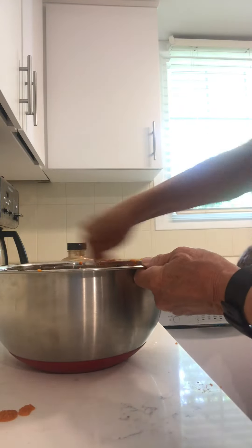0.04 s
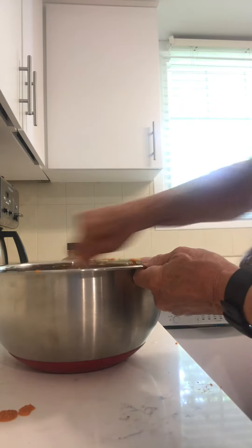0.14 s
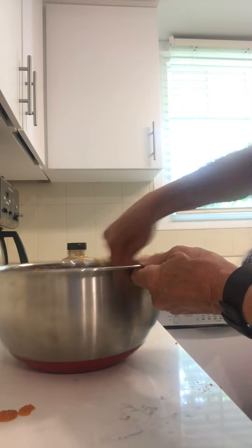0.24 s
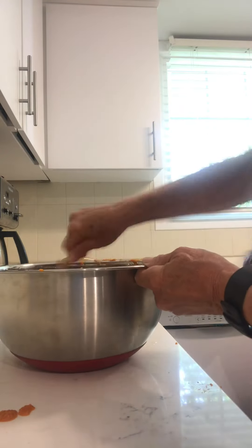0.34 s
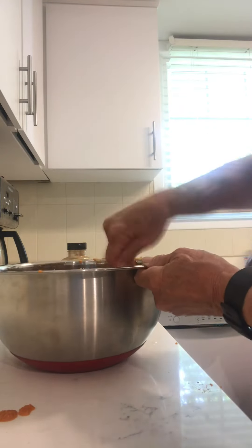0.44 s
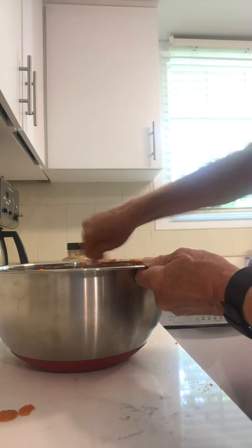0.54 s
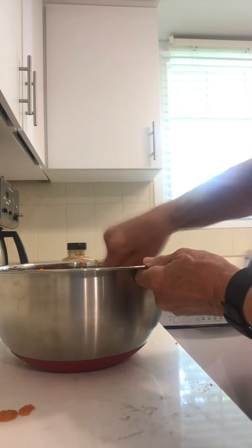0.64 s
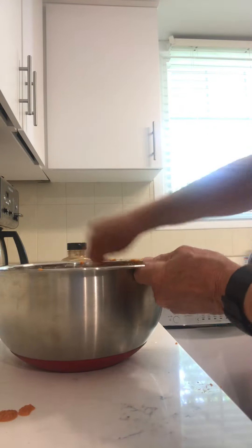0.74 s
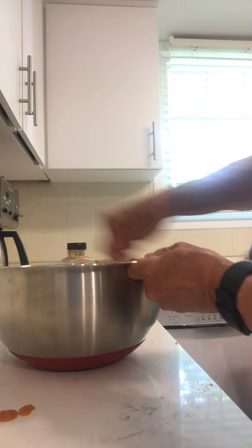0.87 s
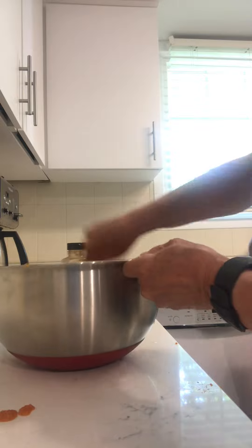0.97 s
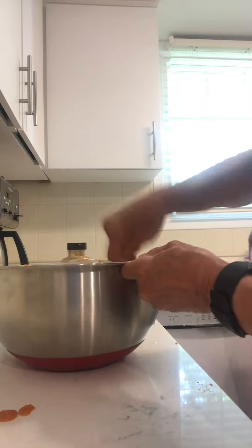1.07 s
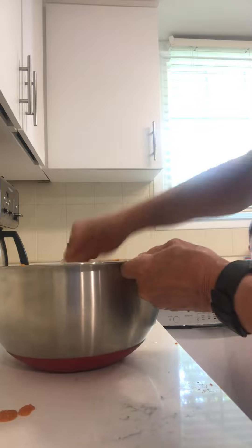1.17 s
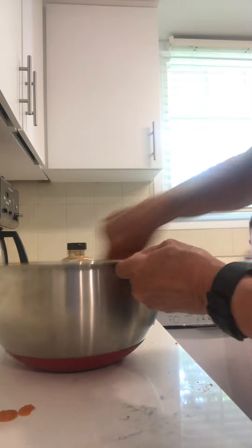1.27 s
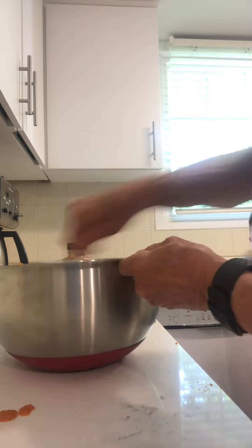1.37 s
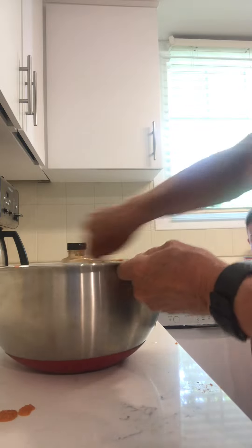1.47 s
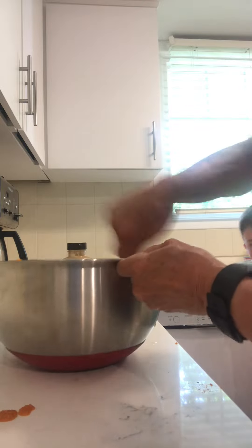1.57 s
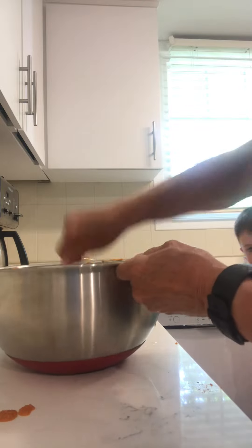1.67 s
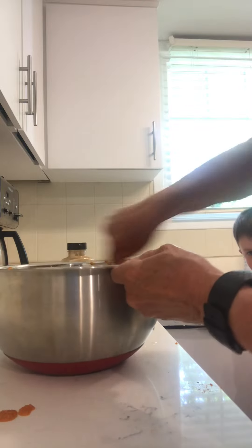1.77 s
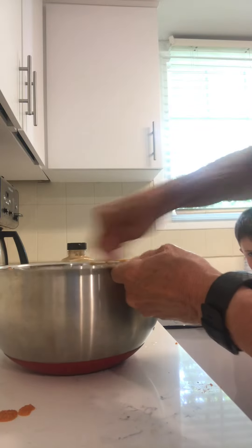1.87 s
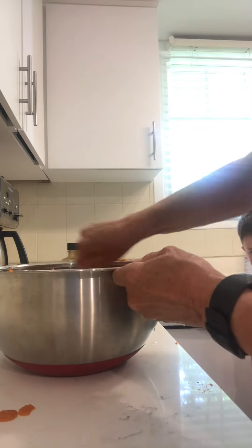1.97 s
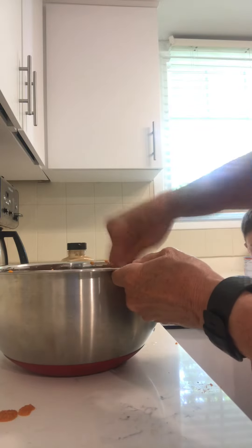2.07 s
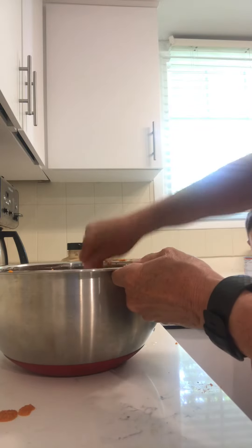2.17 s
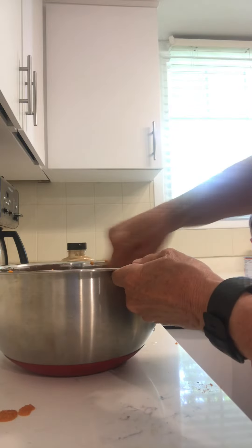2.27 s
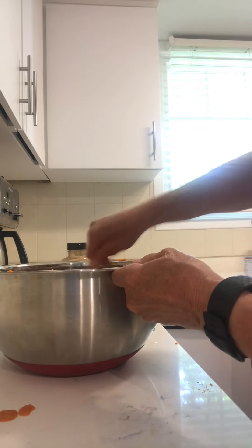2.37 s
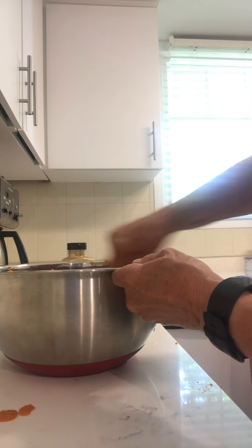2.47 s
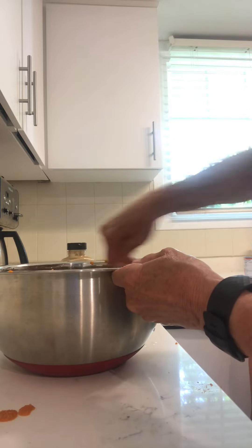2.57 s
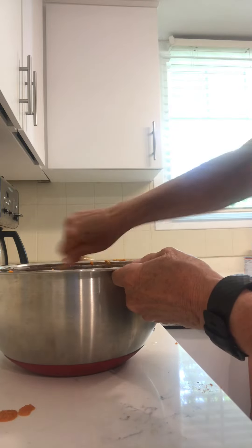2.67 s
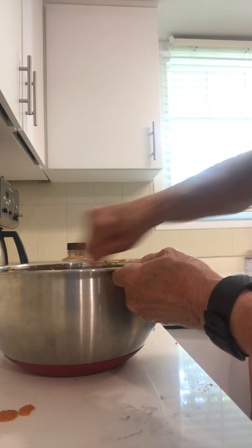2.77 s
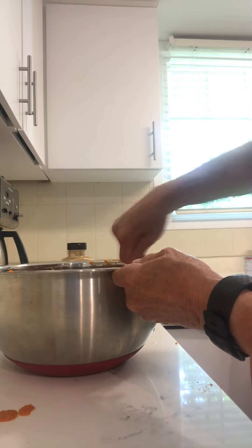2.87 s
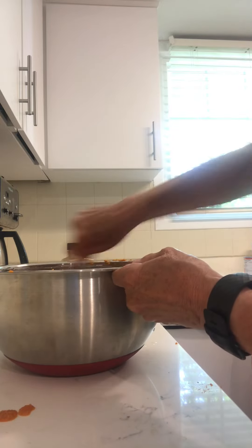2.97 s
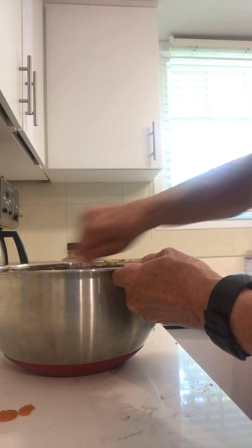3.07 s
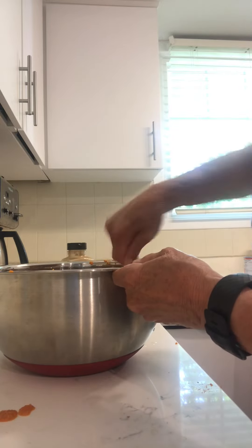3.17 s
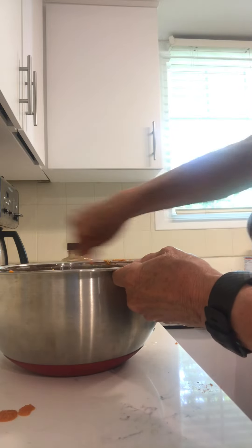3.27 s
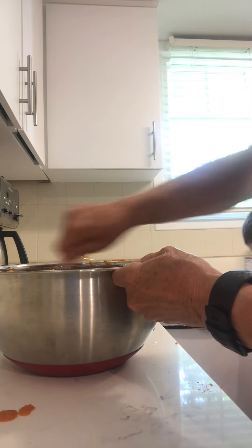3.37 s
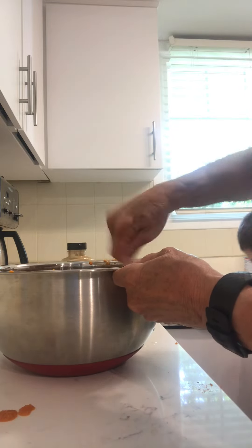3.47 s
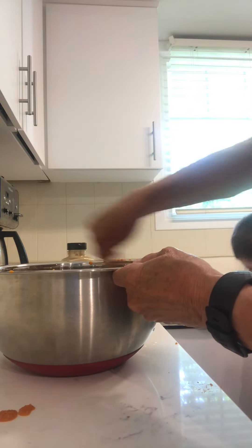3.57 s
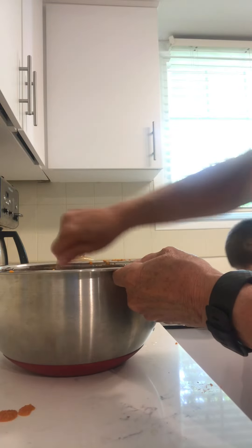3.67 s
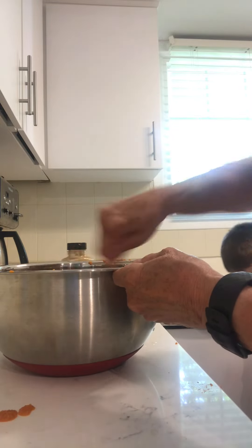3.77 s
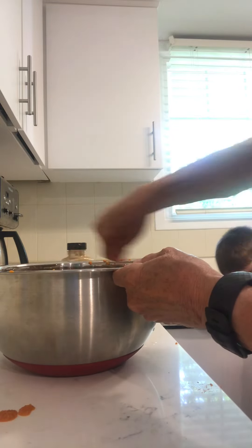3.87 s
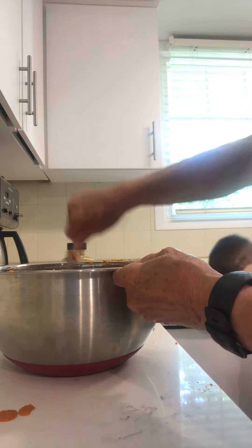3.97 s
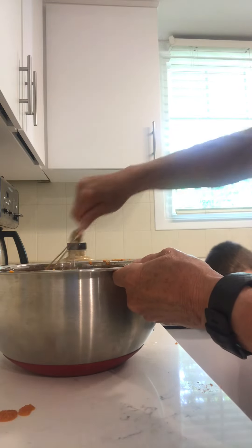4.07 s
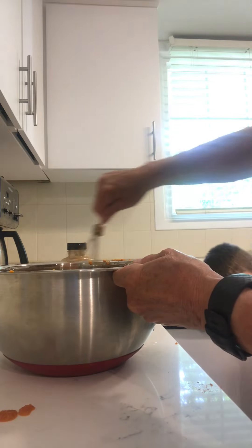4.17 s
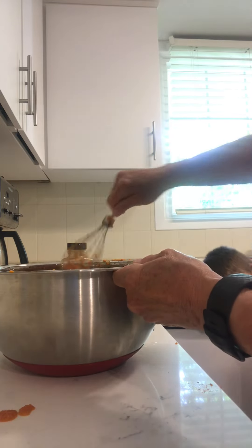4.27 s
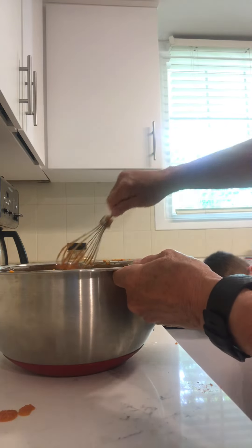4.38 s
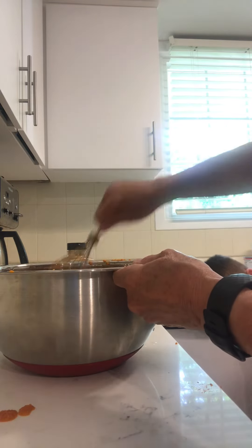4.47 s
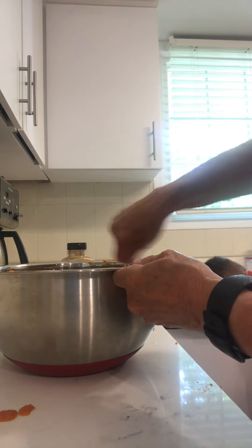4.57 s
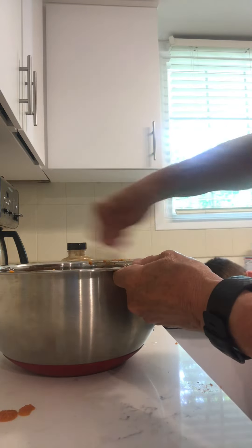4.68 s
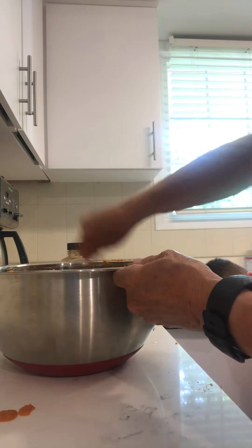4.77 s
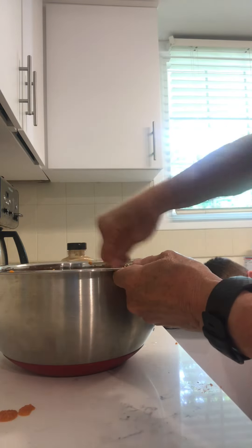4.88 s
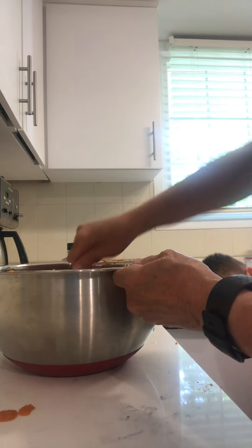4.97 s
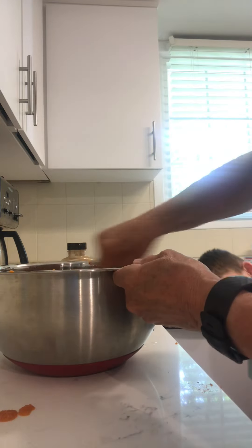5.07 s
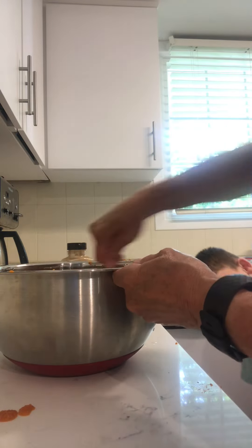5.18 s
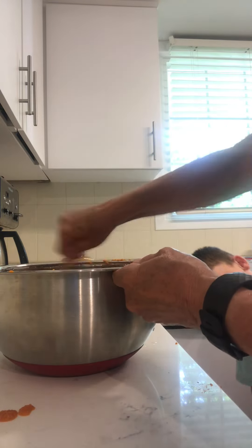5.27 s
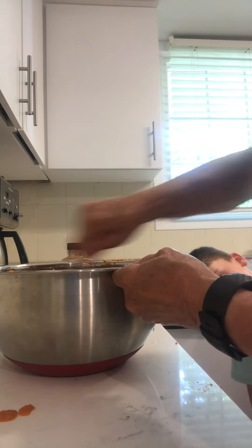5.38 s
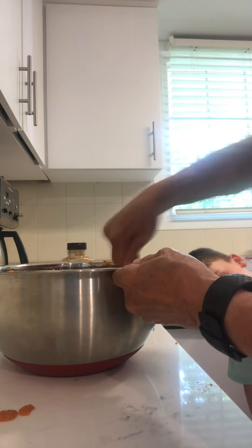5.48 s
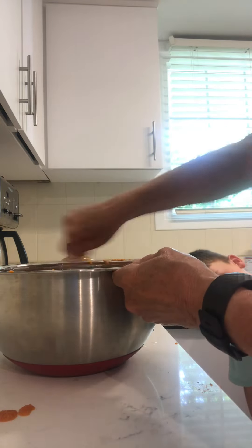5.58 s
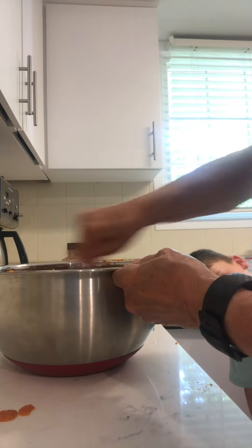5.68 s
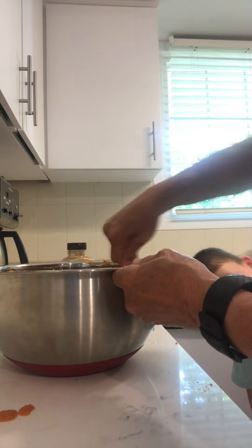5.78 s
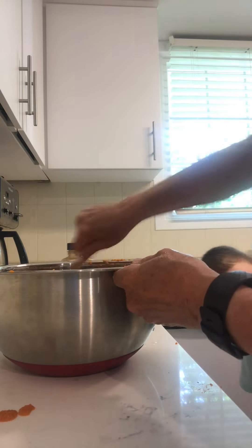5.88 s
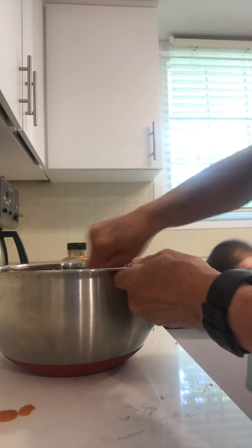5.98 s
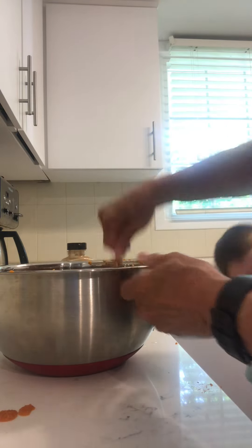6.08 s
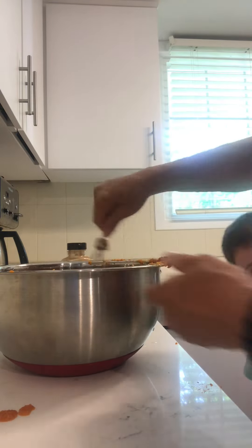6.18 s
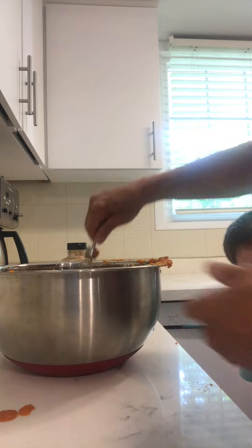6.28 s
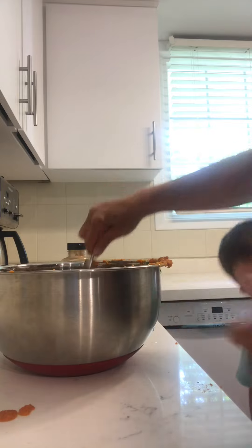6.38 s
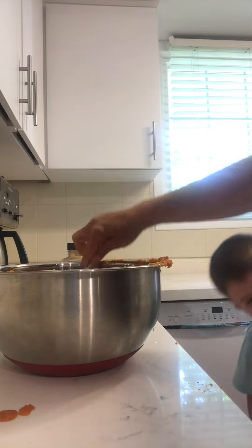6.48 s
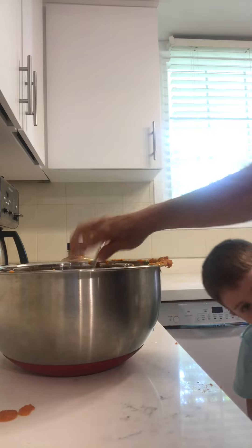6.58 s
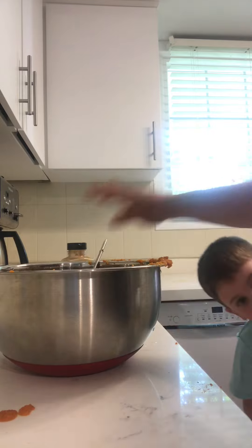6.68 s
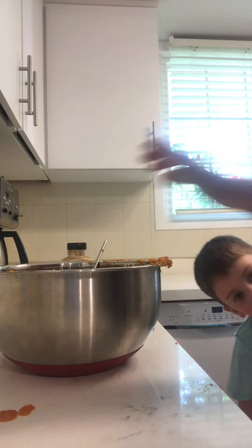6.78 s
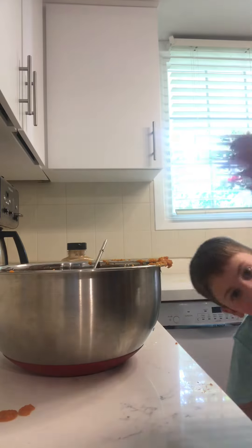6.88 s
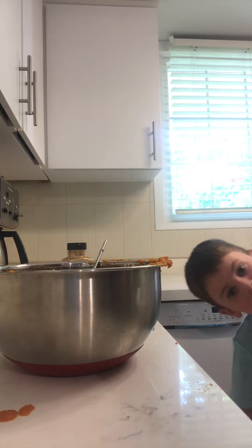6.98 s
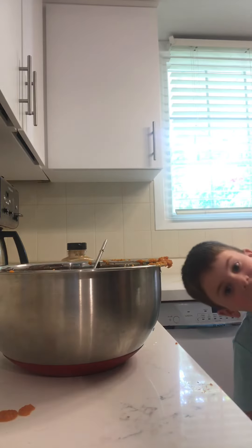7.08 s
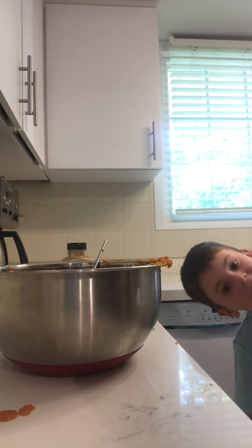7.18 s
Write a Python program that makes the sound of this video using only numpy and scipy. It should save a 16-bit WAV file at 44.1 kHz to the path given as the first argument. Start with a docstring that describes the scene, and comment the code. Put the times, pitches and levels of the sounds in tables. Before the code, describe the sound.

Close, wet whisking in a metal mixing bowl, quick swipes and dull knocks, a brief pause, slower strokes, then a sharp steel clank.

```python
"""A small kitchen, one microphone close to the counter: a wire whisk beats thick filling in a steel mixing bowl.
At about three to four turns a second the wires swish along the wall (filtered bursts of slips), knock on it
and strike it (decaying modes), over squelch and gulps of the filling (shaped noise and short tones).
The squelch drops away, returns and fades; the whisk slides down the rim and drops against it with a clank.
Behind it stand a fridge hum (steady sines), soft air (shaped noise) and the echoes of the room."""
import sys
import numpy as np
from scipy import signal
from scipy.fft import rfft, irfft
from scipy.io import wavfile

SR = 44100
rng = np.random.default_rng(int(sys.argv[2]) if len(sys.argv) > 2 else 0)


def wav_out(sig):
    """Save sig, one row per channel (or a flat mono array), as 16-bit PCM at SR to the path in sys.argv[1]."""
    wavfile.write(sys.argv[1], SR, np.round(np.clip(np.atleast_2d(sig).T, -1, 1) * 32767).astype(np.int16))


N = 319265  # samples

# Levels in the event tables are before the trims of each layer.
# how hard the whisk works the filling: start_s, level_db
EFFORT_CURVE = [(0.0, -47.5), (0.54, -55), (0.86, -52.5), (1.77, -52), (2.23, -50), (2.44, -52.5),
                (2.75, -52.5), (3.58, -51.5), (3.75, -53), (3.93, -56), (4.11, -88), (4.56, -77.5),
                (4.7, -58.5), (4.88, -59.5), (5.49, -51), (5.86, -55.5), (6.12, -66.5), (6.3, -82)]
# pace of the arm: start_s, pace_turns_per_s
ARM_PACE = [(0, 4.3), (2.3, 4.1), (2.798, 3.58), (3.802, 2.62), (4.901, 3.9), (5.7, 3.16)]
FIRST_PASS_S = 0.14  # a pass of the wall; the others lie whole turns away
TURN_SWELL_DB = 1  # the squelch swells by this on each pass and sinks by it between
STOP_S, STOP_FADE_S = 6.4, 0.12  # end of the stirring and the fade before it

# firm swipes of the wires along the wall: start_s, length_s (time scale), level_db,
# bareness_db (+ bare steel, - deep in the filling)
WALL_SWIPES = [(.001, 0.0095, -40.5, -8), (.14, 0.0043, -40, 4.5), (.2, 0.0038, -47.5, -3),
               (.27, 0.006, -35.5, -4.5), (.305, 0.0021, -46.5, -19.5), (.383, 0.0064, -37, 0.5),
               (.482, 0.0062, -38.5, -12), (.525, 0.005, -40, -2.5), (.616, 0.008, -38, -5),
               (.635, 0.0018, -37, 1), (.714, 0.011, -45, 3), (.745, .002, -40, 16.5),
               (.806, 0.0022, -36, 2), (.852, 0.0024, -38.5, 1), (.926, 0.007, -53.5, -10),
               (.98, 0.0067, -38.5, 1.5), (1.078, 0.0046, -39, 2.5), (1.192, 0.005, -38, 1),
               (1.321, 0.003, -36, -2.5), (1.43, 0.0056, -42, 1.5), (1.692, 0.004, -39, -0.5),
               (1.788, .0014, -40, -0.5), (1.833, 0.0011, -40, 3), (1.954, 0.0026, -35.5, 2.5),
               (2.064, .0026, -37, 1), (2.19, 0.0032, -37, 1), (2.253, 0.006, -47.5, -7),
               (2.281, 0.0034, -34, 1.5), (2.402, 0.0036, -36.5, 3.5), (2.465, 0.004, -40, -5),
               (2.494, 0.0022, -37.5, 0), (2.59, .0058, -43.5, -6), (2.629, .0054, -40, 0.5),
               (2.762, .0016, -40.5, 1), (3.052, 0.0048, -49, 3), (3.075, .0032, -43.5, 1),
               (3.109, .0021, -47.5, -0.5), (3.404, 0.0018, -47.5, 5.5), (3.423, 0.0014, -44, 2),
               (3.718, 0.0045, -42.5, -1), (4.565, .012, -49, -1), (4.613, .003, -46, 1.5),
               (4.828, 0.0057, -42.5, -3), (4.882, 0.0034, -43, -3), (5.065, 0.0044, -47, 2.5),
               (5.09, .0028, -39, -1), (5.206, 0.0072, -43.5, -7.5), (5.239, .006, -44.5, -0.5),
               (5.365, 0.003, -41, 4), (5.384, 0.0051, -44.5, -2), (5.653, 0.0092, -47, -3),
               (5.68, .0036, -46.5, -1.5), (5.956, 0.0099, -44, -3.5), (6.375, 0.00075, -61, -5)]
FILLING_DB, WALL_DB, WIRES_DB, SPRAY_DB = 0.65, 0.4, -0.36, -1.5  # parts of a swipe, relative to its level
SPRAY_BARENESS = 0.49  # share of the bareness that the wet spray follows
# light brushes of single wires around each pass; level relative to the effort
BRUSH_DB, BRUSH_LENGTH_S, BRUSH_SCATTER_S = -0.5, 0.0031, 0.08
BRUSH_BARE_DB, BRUSH_SPREAD_DB = 1, 2.5

# air pockets gulping in the filling (the rows at .496 and .509 s are echoes of the .489 s gulp): peak_s,
# level_db, pitch_hz (settled), half_length_s, glide (rise above the pitch at the peak, 0-1)
FILLING_GULPS = [(.002, -29, 587, 0.0021, 0), (.272, -23.5, 170, 0.0046, 0.3), (.311, -6, 540, 0.004, 0.07),
                 (.489, -7, 495, 0.0043, 0.11), (.496, -20, 600, 0.0043, 0), (.509, -33, 560, 0.0022, 0.16),
                 (.534, -25.5, 590, 0.006, 0.06), (2.547, -33, 385, .005, 0.05),
                 (4.596, -33.5, 590, 0.0064, 0.02), (5.079, -30, 387, 0.0034, 0)]
# the bowl bumping on its rubber foot: peak_s, level_db, pitch_hz (settled),
# half_length_s, glide (rise above the pitch at the peak, 0-1)
FOOT_BUMPS = [(.275, -21, 74, 0.006, 0.23), (.29, -30.5, 120, 0.0084, 0.3), (.313, -13, 171.5, 0.005, 0.12),
              (.33, -36, 70, 0.052, 0.1), (.492, -18.5, 159, 0.0052, .1), (.53, -33.5, 75, 0.032, 0),
              (5.945, -39.5, 42, 0.021, 0.04)]

# dead knocks where filling damps the wall: start_s, level_db, upper_mode_db (relative to the lower),
# rebound_db (relative to the knock)
WALL_KNOCKS = [(.234, -29.5, 10.5, -17), (.24, -23, -1, -9), (.799, -20, 6, -5), (.928, -26, -0.5, -2),
               (1.027, -16.5, -2.5, 0), (1.27, -19, -0.5, -4), (1.276, -17.5, 5.5, -31),
               (1.322, -36, 14.5, -20), (1.531, -17, -2.5, -7), (1.788, -18, -1, -18),
               (2.023, -22.5, -0.5, -11)]
REBOUND_S, TICK_DB = 0.014, -20  # delay of the rebound; tick of wire relative to the knock

# strikes on bare steel (the row at 6.638 s is an echo of the 6.605 s clank): start_s, ring_db, best_excited_hz,
# focus_db_per_octave, wire_ring_db, crack_db, ring_time_factor
STEEL_STRIKES = [(0.744, -24, 1960, 58, -18, -27, 0.43), (2.404, -33, 1970, 27.5, -23, -58, .6),
                 (4.52, -14.5, 2650, 40, -16.5, -35.5, 0.52), (4.522, -31, 1320, 66.5, -33, -64, .6),
                 (4.744, -36.5, 1980, 16, -27, -53, 0.23), (4.781, -34.5, 1960, 9, -27.5, -39.5, 0.23),
                 (6.068, -37, 2100, 20, -57, -47, 0.49), (6.430, -57, 2800, 13, -51.5, -44.5, .6),
                 (6.452, -52, 2800, 21.5, -55.5, -57, .6), (6.605, -12.5, 1600, 5.5, -16.5, -12.5, 0.91),
                 (6.638, -27.5, 2006, 9, -25.5, -44.5, 1.0)]
# modes of the steel bowl: pitch_hz, level_db, t60_s (before the ring time factor)
BOWL_MODES = [(372, -1, .16), (566, -8, .25), (673, -8, .3), (899, -5, .22), (991, -8, .16),
              (1125, -13, .22), (1240, -10, .22), (1324, -1, .15), (1495, -14, .15), (1961, 2, .16),
              (1982, -10, .22), (2540, -12, .14), (2620, -12, .17), (2877, -14, .19), (3031, -16, .19),
              (3607, -18, .25), (3818, -10, .24), (4350, -9, .17)]
# modes of the whisk wires: pitch_hz, level_db, t60_s (before the ring time factor)
WIRE_MODES = [(5315, -11, .2), (5696, -7, .2), (5754, -5, .25), (6035, -13, .4), (6200, -1, .3),
              (6324, -3, .3), (6630, -6, .18), (6750, -10, .27), (7063, -11, .16), (7154, -9, .15),
              (7413, -12, .12), (7823, -12, .17), (8585, -11, .11)]

# the handle sliding down the rim: start_s, level_db, rasp_pitch_hz
RIM_SLIDE = [(6.43, -46.5, 2950), (6.479, -57, 3020), (6.52, -52.5, 2850), (6.55, -54, 2710),
             (6.58, -58, 2830), (6.605, -49.5, 2800)]

# Colours are relative: only their shape counts.
# thick filling: frequency_hz, gain_db
FILLING_COLOUR = [(60, -24.5), (160, -16), (250, -6), (380, -7.5), (470, -10), (600, 1), (700, -4),
                  (820, -24), (1200, -21.5), (4000, -61)]
# bowl wall: frequency_hz, gain_db
WALL_COLOUR = [(600, -38.5), (880, -10), (1050, -2.5), (1550, -0.5), (2200, -4.5), (2700, 0.5),
               (3200, -5.5), (4000, -24.5), (8000, -44.5)]
# hissing wires: frequency_hz, gain_db
WIRE_COLOUR = [(3000, -27), (4900, -18.5), (5700, -4), (6400, -8), (7200, -2), (8300, -11), (9500, -16),
               (12000, -35.5)]
# wet spray of bursting films: frequency_hz, gain_db
SPRAY_COLOUR = [(1500, -33.5), (2800, -12.5), (3500, 2.5), (4300, 0), (4900, -4.5), (6500, -0.5),
                (9000, -8), (10300, -11.5), (12000, -8), (16000, -18)]
# sticky crackle of the filling: frequency_hz, gain_db
SQUELCH_COLOUR = [(500, -43), (850, -5.5), (1200, 3.5), (1610, -0.5), (1750, 2), (2600, -0.5), (2940, 0.5),
                  (3580, -1.5), (4920, -11), (5700, -0.5), (6940, -2.5), (9550, -9), (10300, -14),
                  (15000, -15.5), (16000, -38)]
# crack of steel on steel: frequency_hz, gain_db
CRACK_COLOUR = [(60, -17.5), (200, -6), (370, 3.5), (520, -4), (700, 3), (800, -13.5), (980, -0.5),
                (1400, -16), (1900, -0.5), (2300, -15), (4000, -9.5), (4900, -17.5), (6200, -1.5),
                (8500, -17.5), (10500, -38), (16000, -45.5)]
# room air: frequency_hz, gain_db
AIR_COLOUR = [(15, -38), (50, 7.5), (150, 1.5), (300, -3), (430, -9.5), (570, 0.5), (700, -5), (840, -14.5),
              (1300, -11.5), (3000, -21.5), (8000, -31), (16000, -35)]
AIR_DB = -56  # RMS

# mains hum: pitch_hz, level_db (RMS)
MAINS_HUM = [(60, -55.5), (120, -52.5)]
# fridge compressor: shaft_multiple, level_db (RMS)
COMPRESSOR_ORDERS = [(2, -71), (6, -58), (8, -71), (9, -61), (10, -62), (14, -69), (15, -67), (16, -68),
                     (20, -68), (22, -70)]
COMPRESSOR_HZ = 17.1  # shaft speed
# reverberation of the kitchen: frequency_hz, t60_s
ROOM_DECAY = [(150, 0.27), (600, 0.5), (2500, 0.5), (6500, 0.49), (10000, 0.24), (15000, 0.6)]
EDGE_HZ = 16300  # upper band limit at the microphone


def amp(db):
    """Level in dB as a linear gain."""
    return 10 ** (np.asarray(db) / 20)


def evened(x):
    """The signal at an RMS of 1."""
    return x / np.sqrt(np.mean(x ** 2) + 1e-20)


def read(points, hz):
    """A curve read at the given frequencies, on a log frequency axis."""
    f, value = np.transpose(points)
    return np.interp(np.log(hz + 1), np.log(f + 1), value)


def add(mix, s, sound):
    """Lay a sound into the mix at s seconds, trimmed at both ends."""
    start = round(s * SR)
    sound = sound[max(-start, 0):]
    part = mix[max(start, 0):][:len(sound)]
    part += sound[:len(part)]


def clock(size):
    """Time in seconds of each sample."""
    return np.arange(size) / SR


def colour(points, ripple_db=0, size=2048):
    """Causal impulse response with the given spectrum and, if asked, chance resonances about 200 Hz wide."""
    hz = abs(np.fft.fftfreq(size, 1 / SR))
    grid_hz = np.arange(0, SR, 200)
    ripple = np.interp(hz, grid_hz, rng.standard_normal(len(grid_hz)))
    log_gain = np.log(amp(read(points, hz) + ripple_db * ripple))
    minimum_phase = np.exp(np.conj(signal.hilbert(log_gain)))
    return np.fft.ifft(minimum_phase).real[:size // 2]


def burst(drive, response, db):
    """A drive heard through a response, with the energy of 20 ms at the level db."""
    sound = signal.fftconvolve(drive, response)
    return amp(db) * sound * np.sqrt(SR / 50 / np.sum(sound ** 2))


def grit(size, spread_db):
    """Noise of very uneven size, for tiny slips and bursting films."""
    unevenness = np.minimum(rng.exponential(1, size), 4)
    return rng.standard_normal(size) * amp(spread_db * unevenness)


def sparse(size, share):
    """Separate snaps at a small share of the instants."""
    return rng.standard_normal(size) * (rng.random(size) < share)


def clumps(size, step, spread_db):
    """A gain that wanders at random from one step (in samples) to the next."""
    where = np.arange(size) / max(step, 1)
    return amp(spread_db * np.interp(where, np.arange(size), rng.standard_normal(size)))


def dead_mode(t, hz, rise):
    """A mode that swells for rise seconds and dies within a few cycles."""
    return t / rise * np.exp(1 - t / rise) * np.sin(2 * np.pi * hz * t)


def ring(modes, t, tilt_db, damping):
    """Decaying modes, each started at its own phase."""
    hz, db, t60 = np.transpose(modes)[:, :, None]
    phase = rng.random(hz.shape)
    level_db = db + tilt_db - 60 * t / (t60 * damping)
    return np.sum(amp(level_db) * np.sin(2 * np.pi * (hz * t + phase)), 0)


def blips(rows):
    """A few cycles of a tone that swoops down toward its pitch as it swells and fades."""
    out = np.zeros(N)
    for s, db, hz, length, glide in rows:
        u = np.arange(-2.5 * length, 2.5 * length, 1 / SR) / length
        cycles = hz * length * (u - glide * np.exp(-1.5 * u) / 1.5)
        tone = np.exp(-u ** 2) * np.sin(2 * np.pi * cycles)
        add(out, s + u[0] * length, amp(db) * tone)
    return out


def turns():
    """Turns of the whisk so far; a whole number each time it passes the wall."""
    count = np.cumsum(np.interp(clock(N), *np.transpose(ARM_PACE))) / SR
    return count - np.interp(FIRST_PASS_S, clock(N), count)


def effort(t):
    """Level of the stirring in dB at the times t."""
    return np.interp(t, *np.transpose(EFFORT_CURVE))


def bubbles(low_hz, high_hz, per_second, cycles, count=24):
    """Small air pockets that pop in the filling, each ringing briefly at one of count pitches."""
    out, t = np.zeros(N), clock(size=1500)
    pitches = np.geomspace(low_hz, high_hz, count)
    pops = [dead_mode(t, hz, cycles / hz) for hz in pitches]
    for when, kind, size in rng.random((3000, 3))[:int(per_second * N / SR)]:
        add(out, when * N / SR, amp(20 * size ** 2) * pops[int(kind * count)])
    return evened(out)


def squelch():
    """Sticky crackle and popping air over a soft churning, following the effort and swelling on each turn."""
    t = clock(N)
    films = grit(N, spread_db=6) * clumps(N, step=300, spread_db=3.8)
    crackle = evened(signal.oaconvolve(films, colour(SQUELCH_COLOUR))[:N])
    stirring = grit(N, spread_db=2.0) * clumps(N, step=300, spread_db=5.5)
    churn = evened(signal.oaconvolve(stirring, colour(FILLING_COLOUR))[:N])
    small_bubbles = bubbles(low_hz=1154, high_hz=3800, per_second=58, cycles=4.5)
    large_bubbles = bubbles(low_hz=251.3, high_hz=640, per_second=65, cycles=2.6)
    treble = amp(-1.7) * crackle + amp(-8.5) * small_bubbles
    body = amp(-3.0) * churn + amp(-5) * large_bubbles
    moving = np.clip((STOP_S - t) / STOP_FADE_S, 0, 1)
    swell_db = TURN_SWELL_DB * np.cos(2 * np.pi * turns())
    return moving * amp(effort(t) + swell_db) * (treble + body)


def background():
    """Mains hum and the shaft orders of a fridge compressor throb together over soft room air."""
    hz, t = np.fft.rfftfreq(N, 1 / SR), clock(N)
    air = evened(irfft(rfft(rng.standard_normal(N)) * amp(read(AIR_COLOUR, hz)), N))
    lines = MAINS_HUM + [(multiple * COMPRESSOR_HZ, db) for multiple, db in COMPRESSOR_ORDERS]
    hum = np.zeros(N)
    for f, db in lines:
        hum += amp(db) * np.sqrt(2) * np.sin(2 * np.pi * (f * t + rng.random()))
    return amp(AIR_DB) * air + hum


def swipes(rows):
    """Flurries of slips, each by other wires at another spot; the heavy filling answers later and longer.
    The barer the wall, the more the wires hiss and the less the filling is heard."""
    out, t = np.zeros(N), clock(size=3000)
    for s, length, db, bare_db in rows:
        wall, filling = (colour(points, ripple_db=3) for points in (WALL_COLOUR, FILLING_COLOUR))
        wires, spray = (colour(points, ripple_db=1) for points in (WIRE_COLOUR, SPRAY_COLOUR))
        u = t / max(length, 1e-3)
        stroke = (1 - np.exp(-u / 0.29)) * np.exp(-(u / 2.4) ** 0.78)
        stroke *= clumps(len(t), step=44, spread_db=2)
        slips = grit(len(t), spread_db=3) * stroke
        films = (sparse(len(t), share=0.025) + 0.061 * rng.standard_normal(len(t))) * stroke
        push = grit(len(t), spread_db=1.0) * (1 - np.exp(-t / 0.0063)) * np.exp(-t / 0.014)
        add(out, s, burst(push, filling, db + FILLING_DB - bare_db))
        add(out, s, burst(slips, wall, db + WALL_DB))
        add(out, s, burst(slips, wires, db + WIRES_DB + bare_db))
        add(out, s, burst(films, spray, db + SPRAY_DB + SPRAY_BARENESS * bare_db))
    return out


def gulps():
    """Air pockets closing in the filling: short, swooping tones."""
    return blips(FILLING_GULPS)


def brushes(count=3):
    """On each turn a few wires just brush the wall, as hard as the arm is working."""
    pass_times = np.flatnonzero(np.diff(np.floor(turns()))) / SR
    passes = np.repeat(pass_times, count)
    when, size, bare = rng.standard_normal((len(passes), 3)).T
    times = passes + BRUSH_SCATTER_S * when
    levels_db = effort(times) + BRUSH_DB + BRUSH_SPREAD_DB * size
    bareness_db = BRUSH_BARE_DB + BRUSH_SPREAD_DB * bare
    rows = zip(times, levels_db, bareness_db)
    return swipes([(s, BRUSH_LENGTH_S, db, bare_db) for s, db, bare_db in rows if 0 < s < STOP_S])


def knock(db, upper_db):
    """A tick of wire, two broad modes of the loaded wall, then a short rattle and the slop of the filling."""
    t = clock(size=1024)
    lower, upper = 1 + 0.06 * rng.standard_normal(2)  # chance detuning of the modes
    tick = (sparse(len(t), share=0.072) + 0.06 * rng.standard_normal(len(t))) * np.exp(-t / 0.0031)
    rattle = grit(len(t), spread_db=3.5) * np.sin(np.pi * t / t[-1])
    sound = burst(tick, colour(SPRAY_COLOUR), TICK_DB)
    sound += burst(rattle, colour(FILLING_COLOUR), -25.5)
    sound += burst(rattle * np.exp(-t / 0.0087), colour(WALL_COLOUR, ripple_db=0.5), -19.0)
    add(sound, 0, amp(-3.0) * dead_mode(t, hz=1540 * lower, rise=0.0017))
    add(sound, 0, amp(upper_db - 2.5) * dead_mode(t, hz=2720 * upper, rise=0.0012))
    return amp(db) * sound


def knocks():
    """The whisk knocks on the damped wall and rebounds against it."""
    out = np.zeros(N)
    for s, db, upper_db, rebound_db in WALL_KNOCKS:
        add(out, s, knock(db, upper_db))
        add(out, s + REBOUND_S, knock(db + rebound_db, upper_db))
    return out


def bumps():
    """The bowl bumping on its rubber foot: low, short, swooping tones."""
    return blips(FOOT_BUMPS)


def strikes():
    """Steel on steel: a crack, then bowl and wires ring; hand and filling soak up the first swing quickly."""
    out, t = np.zeros(N), clock(size=22000)
    crack, wires = colour(CRACK_COLOUR), colour(WIRE_COLOUR)
    mode_hz = np.array(BOWL_MODES)[:, :1]
    for s, ring_db, best_hz, focus, wires_db, crack_db, damping in STEEL_STRIKES:
        swing = (1 - np.exp(-t / 0.002)) * (0.23 + 1.02 * np.exp(-t / 0.031))
        tilt_db = -focus * abs(np.log2(mode_hz / best_hz))
        bowl = amp(ring_db + 0.5) * ring(BOWL_MODES, t, tilt_db, damping)
        whisk = amp(wires_db - 10.5) * ring(WIRE_MODES, t, 0, damping)
        add(out, s, swing * (bowl + whisk))
        chatter = grit(len(t), spread_db=2.0) * (1 - np.exp(-t / 0.0027)) ** 2 * np.exp(-t / 0.007)
        add(out, s, burst(chatter, crack, crack_db - 5.5))
        add(out, s, burst(chatter, wires, wires_db - 13))
    return out


def slide():
    """Friction of the handle on the rim: noise in one narrow resonance of wandering pitch."""
    s, db, hz = np.transpose(RIM_SLIDE)
    t, out = np.arange(s[0], s[-1], 1 / SR), np.zeros(N)
    smooth = signal.butter(2, 260, fs=SR)
    noise = rng.standard_normal(len(t)) + 1j * rng.standard_normal(len(t))
    rasp = signal.lfilter(*smooth, noise)
    cycles = np.cumsum(np.interp(t, s, hz)) / SR
    rasp = (rasp * np.exp(2j * np.pi * cycles)).real  # shift the smooth noise up to the rasp pitch
    add(out, s[0], amp(np.interp(t, s, db)) * evened(rasp))
    return out


def kitchen(x, near_db=-9, tail_db=-11):
    """Quick echoes from bowl, counter and cupboards, then a short tail that dies by band."""
    t = clock(size=26000)
    near = grit(len(t), spread_db=2.5) * (t > 0.003) * np.exp(-t / 0.003)
    hz, when, z = signal.stft(rng.standard_normal(len(t)), SR, nperseg=256)
    decay = amp(-60 * when / read(ROOM_DECAY, hz)[:, None])
    tail = signal.istft(z * decay, SR, nperseg=256)[1][:len(t)]
    tail *= np.clip(t / 0.014 - 0.5, 0, 1)  # the tail enters from 7 to 21 ms
    response = amp(near_db) * near / np.linalg.norm(near) + amp(tail_db) * tail / np.linalg.norm(tail)
    return signal.oaconvolve(x, response)[:N]


def scene():
    """Whisk and filling, heard close by with the echoes and hum of the kitchen."""
    whisk = squelch() + swipes(WALL_SWIPES) + brushes() + knocks() + strikes() + slide()
    thuds = gulps() + bumps()
    echoes = kitchen(whisk + amp(-3.5) * thuds)
    return (whisk + thuds + echoes + background())[None]


def record(dry):
    """The microphone's upper band limit, as a linear-phase low-pass."""
    low_pass = signal.firwin(255, EDGE_HZ, window=("kaiser", 9), fs=SR)
    return signal.oaconvolve(dry, low_pass[None], "same")


dry = scene()
out = record(dry)
wav_out(out)
```